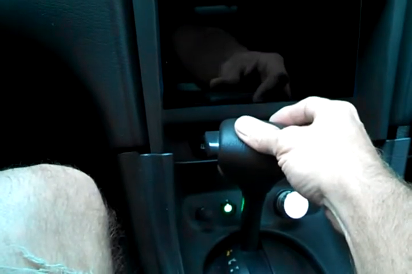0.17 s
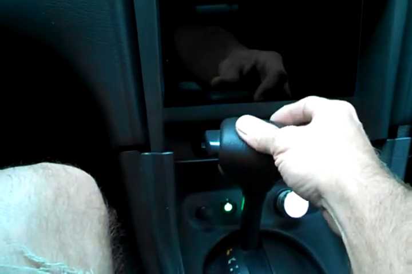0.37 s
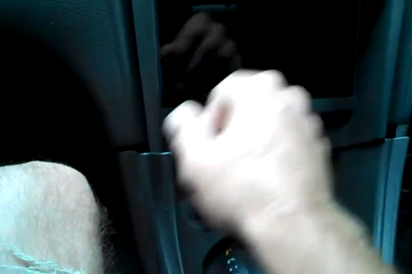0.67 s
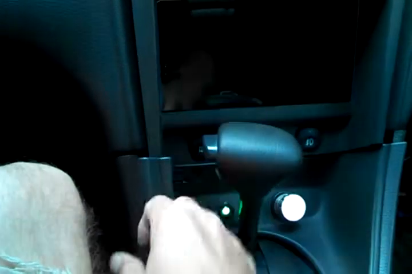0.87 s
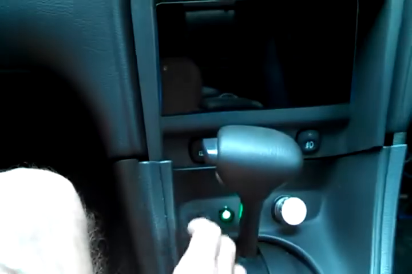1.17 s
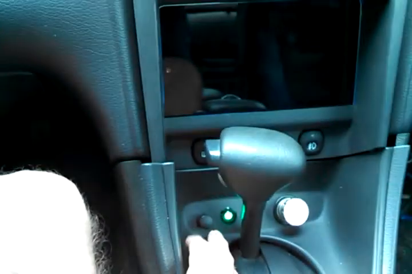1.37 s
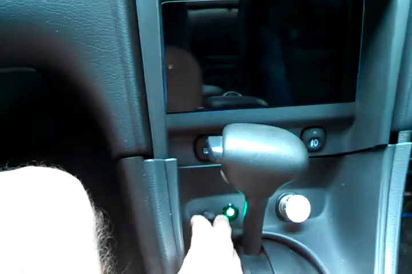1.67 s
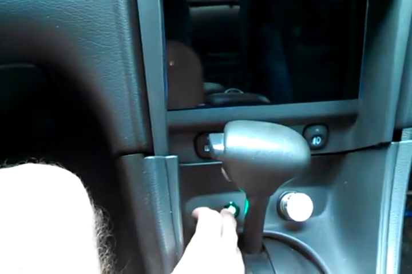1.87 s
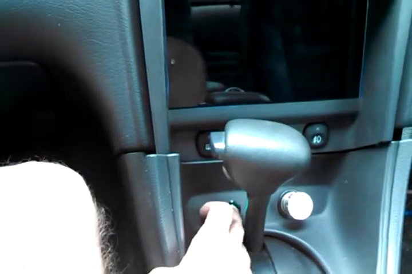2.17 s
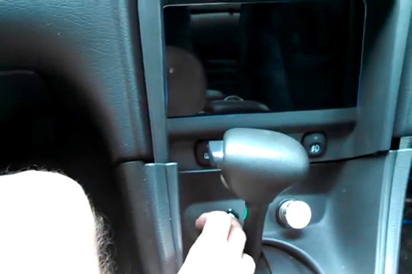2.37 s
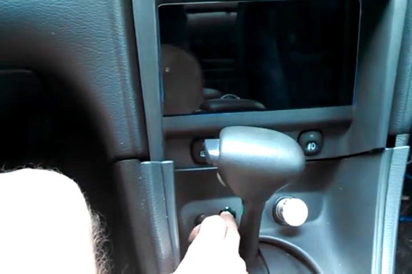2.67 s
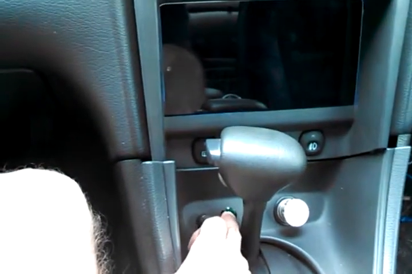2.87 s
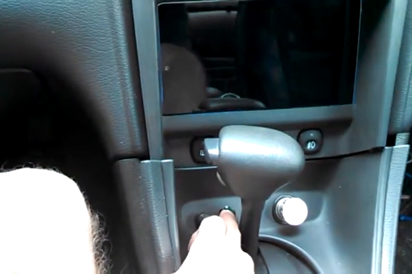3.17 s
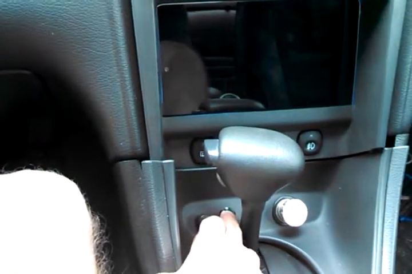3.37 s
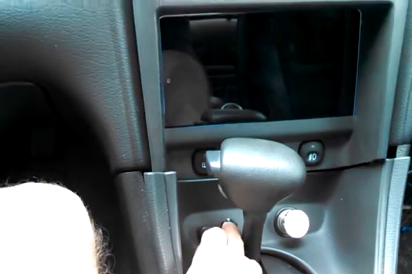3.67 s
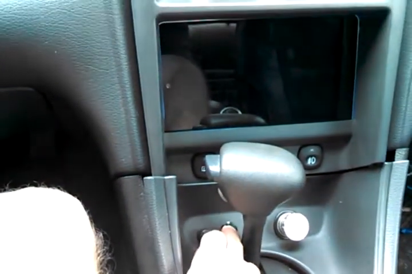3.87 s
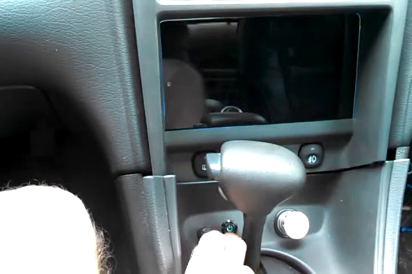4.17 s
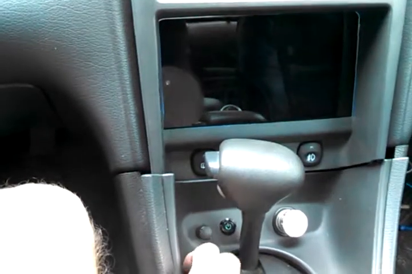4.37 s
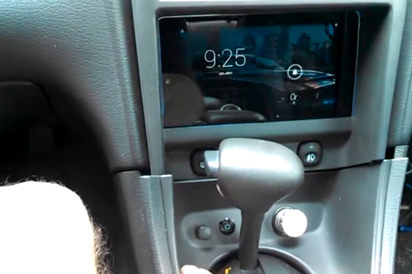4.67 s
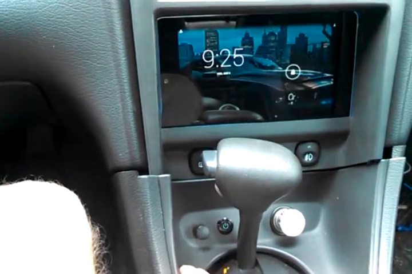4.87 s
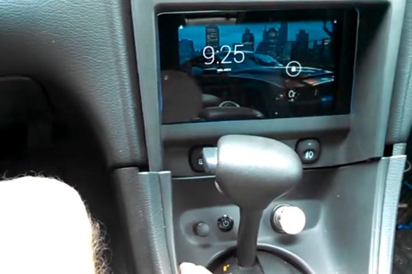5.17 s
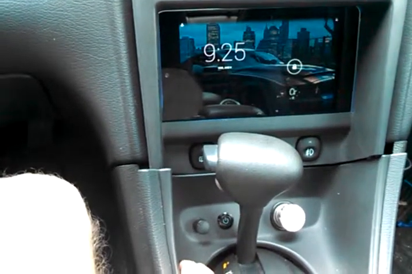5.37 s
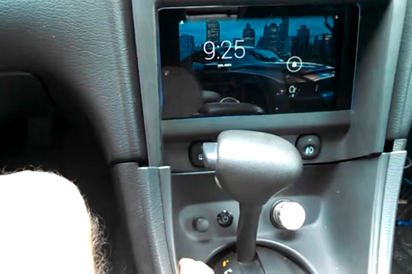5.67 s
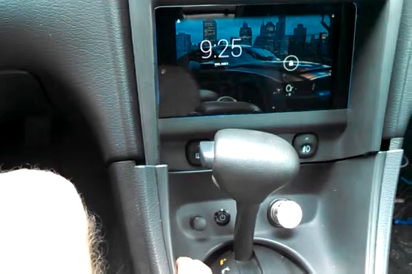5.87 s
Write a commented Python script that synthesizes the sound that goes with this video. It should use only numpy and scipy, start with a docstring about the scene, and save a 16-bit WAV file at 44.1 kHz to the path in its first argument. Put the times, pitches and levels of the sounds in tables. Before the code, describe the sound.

A close stereo microphone hears a car's centre console over low, slowly swelling cabin hum and hiss. A sharp double knock rattles the plastic, followed by soft skin brushes and barely audible fumbling. A crisp toggle click with smaller ticks comes midway; a second, quieter pair follows, then slight rubbing and a few dry taps on the trim before only the dull background remains.

```python
"""Hand at a car console

Inside a parked car a hand knocks on the plastic centre console, works a small toggle switch and slides away.
Knocks and clicks are dying noise mixed with ringing modes; rubs are uneven noise that drives the same panels.
A drifting low hum, filtered cabin noise and hiss lie underneath.
A close camera with two microphone ports hears it and widens the stereo."""
import sys
import numpy as np
from scipy import signal
from scipy.fft import rfft, irfft, next_fast_len
from scipy.io import wavfile
from scipy.ndimage import uniform_filter1d

SR = 44100
rng = np.random.default_rng(int(sys.argv[2]) if len(sys.argv) > 2 else 0)


def to_wav(sig):
    """Store sig (one row per channel, or 1-D mono) as 16-bit WAV at the path in sys.argv[1].

    Samples outside -1..1 are clipped; the rate is SR.
    """
    pcm = np.clip(np.atleast_2d(sig), -1, 1) * 32767
    pcm = np.round(pcm).astype(np.int16)
    wavfile.write(sys.argv[1], SR, pcm.T)  # frames by channels


N = 264644
TIME = np.arange(N) / SR
RING = TIME[:SR // 3]  # the time axis of one short sound, in seconds

# slow swell of the whole background: [t/s, level/dB]
BACKGROUND_SWELL = [(0, -3), (1.3, 1.5), (3.5, -1), (4.2, 1.3), (6, -1)]
# cabin noise, alike at both ports: [f/Hz, relative level per Hz/dB]
CABIN_SPECTRUM = [(25, -27), (40, -3), (55, -1), (80, -5), (112, -3.5), (150, -6.5), (200, -29), (265, -8),
                  (370, -24), (470, -21.5), (700, -37), (1400, -43), (4000, -60)]
# separate hiss of each port: [f/Hz, relative level per Hz/dB]
HISS_SPECTRUM = [(20, -22), (35, -17), (55, 0.5), (110, -3), (155, -5.5), (400, -13.5), (600, -18),
                 (1000, -24.5), (2600, -28.5), (5500, -34), (11000, -40.5), (15400, -35), (16000, -59)]
# knocks on the console:
# [t/s, level/dB, rise time constant/s, contact corner f/Hz, strongest resonance f/Hz]
KNOCKS_ON_CONSOLE = [(0.9369, -21, 0.0018, 3430, 1880), (0.9862, -24, 0.00088, 3500, 710),
                     (1.095, -43, 0.0077, 850, 720), (1.159, -42, .003, 850, 720),
                     (1.796, -46, 0.0027, 750, 270), (1.834, -50.5, 0.0018, 450, 350),
                     (2.5, -48.5, 0.0023, 380, 288), (3.11, -57, .001, 1200, 1160),
                     (3.2845, -41, 0.00068, 660, 800), (3.489, -46.5, .0016, 300, 304),
                     (3.978, -47, 0.0033, 775, 313), (4.057, -44.5, 0.0013, 1090, 1100),
                     (4.105, -45.5, .0013, 950, 336), (4.5249, -41.5, 0.0015, 1670, 1080),
                     (4.538, -33.5, 0.00022, 2600, 1100), (4.6017, -37, 0.0014, 2070, 1020),
                     (4.623, -39.5, 0.001, 300, 270), (4.692, -52.5, .0026, 399, 300),
                     (4.987, -46.5, 0.0024, 770, 493)]
# skin rubbing over the trim, the level being set before the swell and fade:
# [peak t/s, swell time constant/s, fade time constant/s, level/dB, corner f/Hz, bezel ring level/dB]
SKIN_RUBS = [(1.096, .018, 0.021, -39.5, 3230, -6.5), (1.162, 0.02, 0.012, -43, 3430, -14),
             (1.355, 0.006, .028, -47.5, 8500, -19), (4.345, 0.0061, 0.033, -41, 4200, 1.5),
             (4.401, 0.013, 0.013, -43.5, 4420, -1.5)]
# clicks of the toggle switch: [t/s, level/dB, ping f/Hz, ping lift (or cut)/dB]
SWITCH_CLICKS = [(3.2834, -28, 6000, 1), (3.3614, -36.5, 1380, 15.5), (3.4707, -38.5, 15700, 10),
                 (4.0325, -39.5, 13500, -1.5), (4.056, -35.5, 13600, 3.5)]
# modes of the console panels, widths before the damping factor: [f/Hz, width/Hz, relative level/dB]
PANEL_MODES = [(382, 13, 1), (417, 10, -11), (725, 16, 4.5), (848, 28, -8.5), (1039, 39, -3.5),
               (1343, 100, -4), (1462, 40, -2), (1780, 35, -5.5), (1918, 40, -2.5), (2222, 73, -4.5),
               (2280, 15, -5.5), (3160, 42, -2), (3600, 32, -6), (4170, 41, -5), (4240, 61, -0.5),
               (4880, 180, -3.5), (5930, 60, -27)]
# modes of the shifter's bezel, same columns: [f/Hz, width/Hz, relative level/dB]
BEZEL_MODES = [(1087, 55, -9), (1324, 63, -1), (1866, 34, -7), (3465, 18, -11.5), (4550, 60, -39)]
# modes of the switch, same columns: [f/Hz, width/Hz, relative level/dB]
SWITCH_MODES = [(1450, 37, 1.5), (3940, 130, -1), (4720, 36, -5), (5400, 140, -2), (5940, 160, 4.5),
                (7100, 70, -9), (7300, 200, -3), (9000, 80, 0)]
# dense rattle of the trim: [f/Hz, gain/dB]
TRIM_SPECTRUM = [(60, -22), (170, 7.5), (320, 14.5), (500, 7.5), (800, 4), (1400, 3.5), (2600, 5.5),
                 (4300, 3), (6500, 6.5), (11000, 6), (15000, 8)]
# body of a switch click: [f/Hz, gain/dB]
SNAP_SPECTRUM = [(100, 1), (350, 5.5), (800, 4.5), (2200, 3), (4000, 5.5), (7500, 5.5), (10500, -0.5),
                 (13000, 0), (15500, 4.5)]

CABIN_DB, HISS_DB, HUM_DB = -47, -50.5, -48.5  # before the background swell
HUM_HZ = 56.7  # centre of the drifting pitch
REFERENCE_HZ, REFERENCE_DB = 1000, -40  # a knock of middling hardness and strength
CRACK_DB, CRACK_DB_PER_OCTAVE = -7, 5  # over the rattle, at the reference corner
RING_DB, RING_DB_PER_DB = -8, 0.48  # over the rattle, at the reference level
RATTLE_T60_S = 0.078  # time to die by 60 dB
FIDGETS_PER_S, FIDGET_DB, FIDGET_SPREAD_DB = 0.9, -61, 4
FIDGET_RISE_S, FIDGET_CORNER_HZ, FIDGET_SPOT_HZ = 0.0035, 450, 316
RUB_PANEL_DB, SQUEAK_DB = -10, 6
SNAP_DB, CLICK_T60_S = 12.5, 0.069
LEVEL_SAMPLES = 970  # knocks and clicks get their level over their first 22 ms
PORT_LAG = 16  # samples
TOP_HZ = 16500


def undb(db):
    """Turn decibels into a gain."""
    return 10 ** (np.asarray(db) / 20)


def level(x, db, size=None):
    """Scale x so that its first size samples (or all of it) have this rms level."""
    return x * undb(db) / np.sqrt(np.mean(x[..., :size] ** 2))


def shape(x, gain):
    """Filter by gain(Hz) in minimum phase, so that the energy comes as early as it can."""
    size = 2 * next_fast_len(x.shape[-1])
    hz = np.arange(size // 2 + 1) * SR / size + 1
    cepstrum = irfft(np.log(gain(hz) + 1e-6))
    # folding the cepstrum onto positive times makes the phase minimal
    cepstrum[1:size // 2] *= 2
    cepstrum[size // 2 + 1:] = 0
    response = np.exp(rfft(cepstrum))
    return irfft(rfft(x, size) * response)[..., :x.shape[-1]]


def colour(x, points):
    """Filter by a spectrum of (Hz, dB) points, joined along log frequency."""
    hz, db = np.transpose(points)
    return shape(x, lambda f: undb(np.interp(np.log(f), np.log(hz), db)))


def soften(x, corner_hz):
    """A soft contact passes little above its corner."""
    return shape(x, lambda f: 1 / np.sqrt(1 + (f / corner_hz) ** 4))


def ping(x, hz, db, q):
    """Lift (or, below 0 dB, cut) one resonance; a higher q is narrower."""
    return shape(x, lambda f: undb(db / (1 + (q * (f / hz - hz / f)) ** 2)))


def burst(t60):
    """Two unrelated dying noises stand for a crowd of short modes and reflections."""
    return rng.standard_normal((2, len(RING))) * np.exp(-np.log(1000) * RING / t60)


def ring(modes, damping):
    """Two mixtures of dying sine modes, wider ones dying faster; rms 1 over the first 10 ms."""
    hz, width, db = np.transpose(modes)[:, :, None]
    phase = rng.uniform(0, 2 * np.pi, (2, len(modes), 1))
    decay = np.exp(-np.pi * damping * width * RING)
    waves = undb(db) * width * decay * np.sin(2 * np.pi * hz * RING + phase)
    return level(waves.sum(axis=1), 0, size=441)


def ports(pair, apart_hz, slope):
    """Sum and difference at two close ports: long waves reach both alike."""
    side = shape(pair[1], lambda f: np.minimum(f / apart_hz, 1) ** slope)
    return np.array([pair[0] + side, pair[0] - side])


def add(out, s, x):
    """Mix x in at time s, cutting what runs past the end."""
    start = int(s * SR)
    out[:, start:start + x.shape[1]] += x[:, :N - start]


def walk(rate):
    """Random values, one every 1 / rate s, smoothed twice into a slow wander of rms 1."""
    hold = int(SR / rate)
    steps = np.repeat(rng.standard_normal(N // hold + 1), hold)
    smooth = uniform_filter1d(uniform_filter1d(steps, hold), hold)
    return level(smooth[:N], 0)


def background(drift=0.018, drift_rate_hz=6.8):
    """A low hum of wandering pitch and the cabin's air resonances, under microphone hiss."""
    cabin = level(colour(rng.standard_normal(N), CABIN_SPECTRUM), CABIN_DB)
    hum_hz = HUM_HZ * (1 + drift * walk(drift_rate_hz))
    hum = level(np.sin(2 * np.pi * np.cumsum(hum_hz) / SR), HUM_DB)
    hiss = level(colour(rng.standard_normal((2, N)), HISS_SPECTRUM), HISS_DB)
    swell = undb(np.interp(TIME, *np.transpose(BACKGROUND_SWELL)))
    return (cabin + hum + hiss) * swell


def fidgets():
    """Faint soft bumps of the hand at random moments, as rows like those of the knocks."""
    rows = []
    for when, force, spot in rng.random((int(FIDGETS_PER_S * N / SR), 3)):
        db = FIDGET_DB + FIDGET_SPREAD_DB * (2 * force - 1)
        spot_hz = FIDGET_SPOT_HZ * 2 ** (spot - 0.5)  # up to half an octave either way
        rows.append((when * TIME[-1], db, FIDGET_RISE_S, FIDGET_CORNER_HZ, spot_hz))
    return rows


def console(crack_t60=0.028, damping=1.08, cabin_db=-26, cabin_t60=0.54, spot_db=6, spot_q=6):
    """Blows on hollow plastic: a crack, a rattle and panel modes, then a faint cabin tail."""
    out = np.zeros((2, N))
    for s, db, rise, corner_hz, spot_hz in list(KNOCKS_ON_CONSOLE) + fidgets():
        # harder contacts crack more, stronger blows ring the panels more
        hardness = corner_hz / REFERENCE_HZ
        crack_db = CRACK_DB + CRACK_DB_PER_OCTAVE * np.log2(hardness)
        ring_db = RING_DB + RING_DB_PER_DB * (db - REFERENCE_DB)
        crack = undb(crack_db) * burst(crack_t60)
        tail = undb(cabin_db) * burst(cabin_t60)
        rattle = colour(crack + burst(RATTLE_T60_S) + tail, TRIM_SPECTRUM)
        panels = undb(ring_db) * ring(PANEL_MODES, damping)
        knock = (rattle + panels) * (1 - np.exp(-RING / rise))
        # the spot that is struck favours its own resonance
        knock = ping(soften(knock, corner_hz), spot_hz, spot_db, spot_q)
        heard = ports(knock, apart_hz=1740, slope=1.36)
        add(out, s, level(heard, db, size=LEVEL_SAMPLES))
    return out


def rubs(grain_db=5, rattle_t60=0.11, squeak_hz=4350, squeak_q=11.0, damping=0.42):
    """Dense uneven slips of skin drive the panels and the bezel."""
    out = np.zeros((2, N))
    t = RING - RING.mean()  # zero at the peak
    for s, swell, fade, db, corner_hz, bezel_db in SKIN_RUBS:
        # noise whose strength jumps from sample to sample
        slips = rng.standard_normal(len(RING)) * undb(grain_db * rng.exponential(size=len(RING)))
        trim = colour(burst(rattle_t60), TRIM_SPECTRUM)
        panels = undb(RUB_PANEL_DB) * ring(PANEL_MODES, damping)
        bezel = undb(bezel_db) * ring(BEZEL_MODES, damping)
        # every slip sets off the body's response (convolution)
        rub = irfft(rfft(trim + panels + bezel) * rfft(slips))
        rub = ping(soften(rub, corner_hz), squeak_hz, SQUEAK_DB, squeak_q)
        rub = level(ports(rub, apart_hz=1700, slope=0.83), db)
        # the hand presses in, then lifts
        add(out, s + t[0], rub * np.exp(np.minimum(t / swell, -t / fade)))
    return out


def switch(snap_t60=0.006, rise=0.00013, ring_db=-5, damping=1.0, ping_q=1.65):
    """The spring snaps the contact over; the housing and the dash ring briefly."""
    out = np.zeros((2, N))
    for s, db, ping_hz, ping_db in SWITCH_CLICKS:
        snap = undb(SNAP_DB) * burst(snap_t60)
        body = colour(snap + burst(CLICK_T60_S), SNAP_SPECTRUM)
        click = body + undb(ring_db) * ring(SWITCH_MODES, damping)
        click = ping(click * (1 - np.exp(-RING / rise)), ping_hz, ping_db, ping_q)
        heard = ports(click, apart_hz=1900, slope=1.04)
        add(out, s, level(heard, db, size=LEVEL_SAMPLES))
    return out


def scene():
    """Add up everything that reaches the two ports."""
    return background() + console() + rubs() + switch()


def record(dry, balance_db=-1.03):
    """Subtract from each port the other one a moment later to widen the stereo; round peaks, cut the top."""
    other = np.pad(dry[::-1], ((0, 0), (PORT_LAG, 0)))[:, :N]
    balance = undb([[balance_db / 2], [-balance_db / 2]])
    wide = (dry - other) / np.sqrt(2) * balance
    rounded = 0.4 * np.tanh(wide / 0.4)
    # steep low-pass: order 10, 0.2 dB ripple, 80 dB down above the top
    top_cut = signal.ellip(10, 0.2, 80, TOP_HZ, fs=SR, output="sos")
    return signal.sosfilt(top_cut, rounded)


dry = scene()
out = record(dry)
to_wav(out)
```